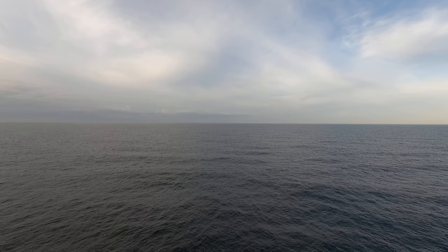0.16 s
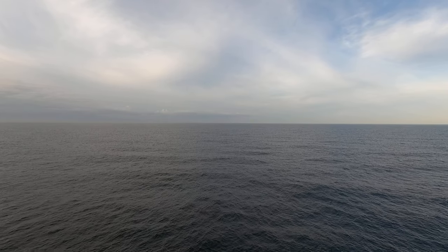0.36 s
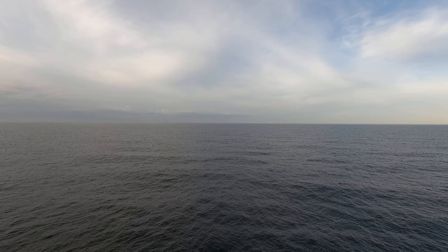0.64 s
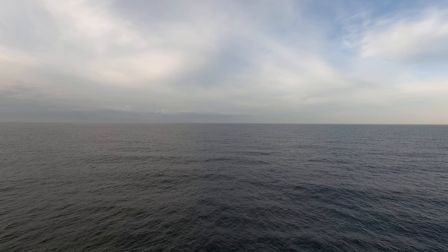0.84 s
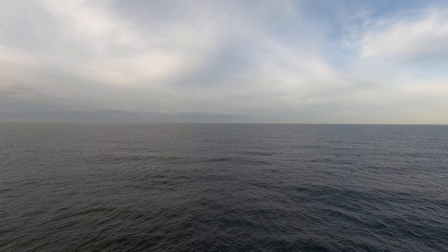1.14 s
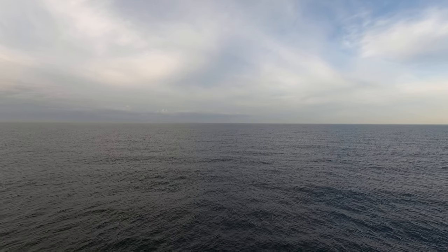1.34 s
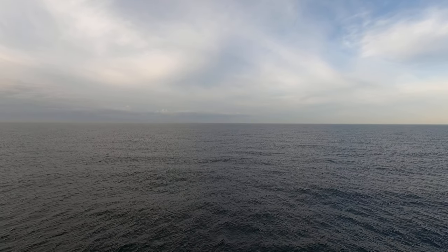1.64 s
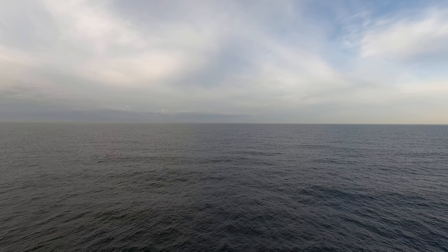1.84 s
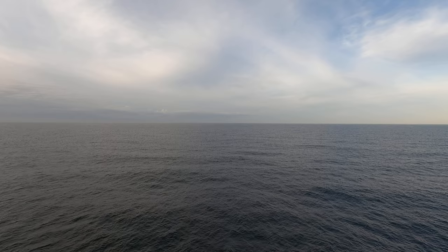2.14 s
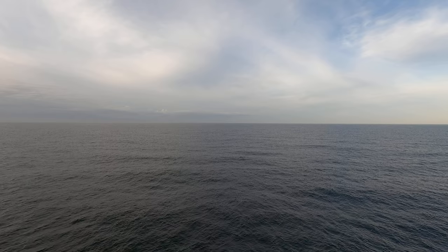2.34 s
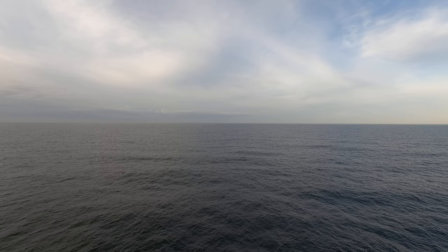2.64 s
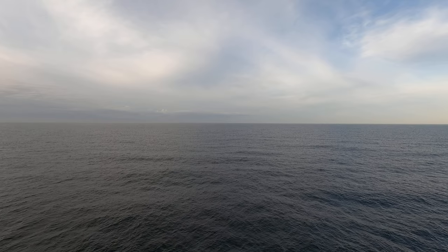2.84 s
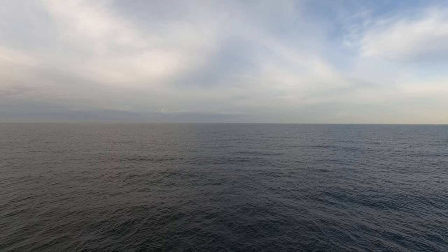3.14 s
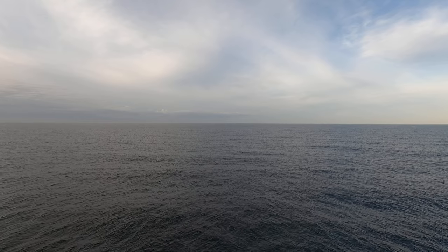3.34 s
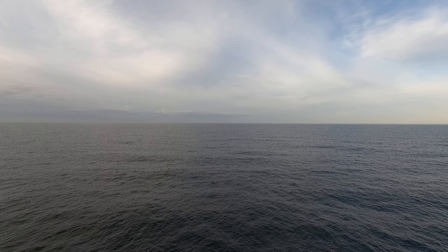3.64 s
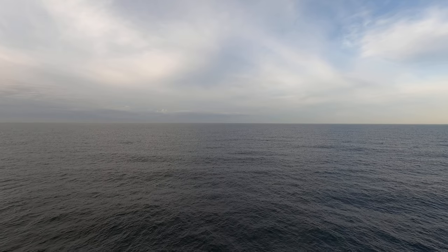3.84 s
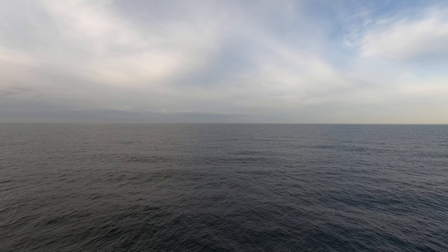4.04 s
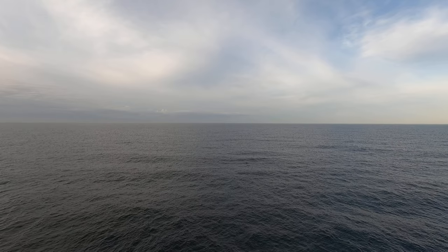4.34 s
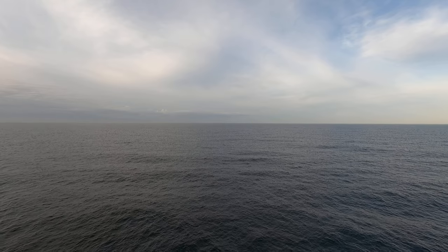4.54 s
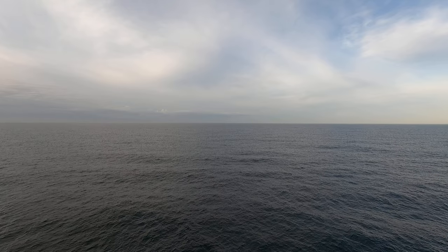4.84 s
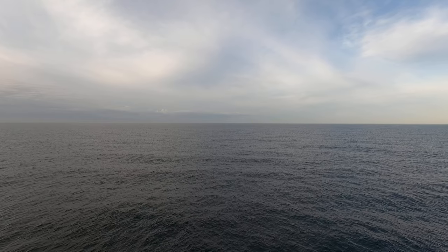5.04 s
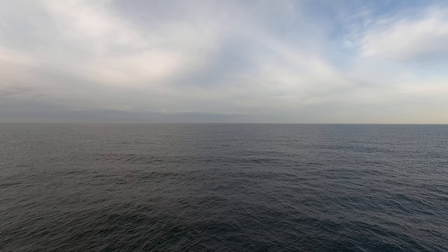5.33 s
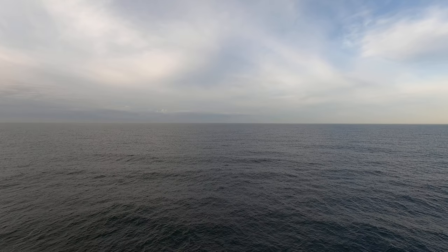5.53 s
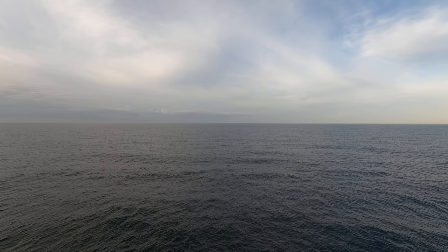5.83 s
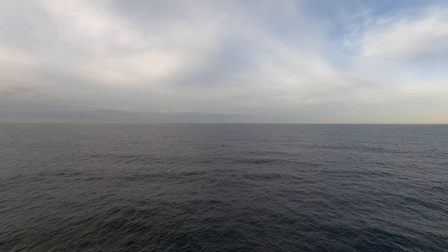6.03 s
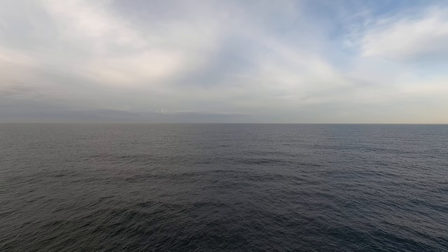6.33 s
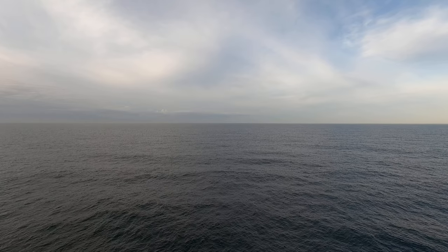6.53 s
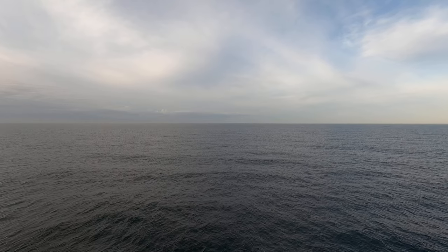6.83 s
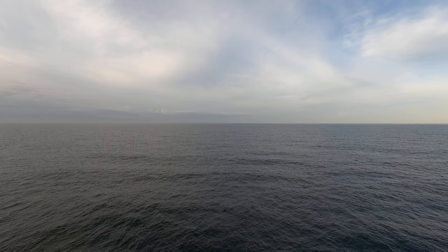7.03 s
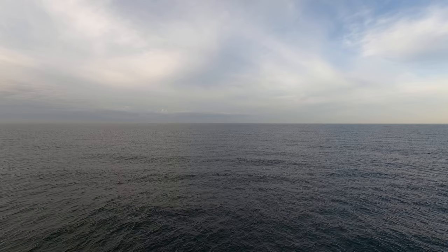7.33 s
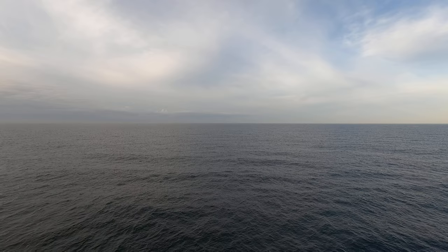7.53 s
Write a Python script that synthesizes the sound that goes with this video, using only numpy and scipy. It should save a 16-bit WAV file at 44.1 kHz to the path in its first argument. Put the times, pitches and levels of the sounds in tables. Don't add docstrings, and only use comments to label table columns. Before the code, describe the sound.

Strong steady wind buffets a bare microphone at sea, deep uneven rumble with fluttering puffs, hard thumps and a faint distant water hiss.

```python
import sys
import numpy as np
from scipy import signal
from scipy.fft import rfft, irfft, next_fast_len
from scipy.io import wavfile
from scipy.ndimage import uniform_filter1d

SR = 44100
rng = np.random.default_rng(int(sys.argv[2]) if len(sys.argv) > 2 else 0)


def to_wav(sig):
    pcm = np.clip(np.atleast_2d(sig), -1, 1) * 32767
    pcm = np.round(pcm).astype(np.int16)
    wavfile.write(sys.argv[1], SR, pcm.T)


def nominal_scale(level):
    x = np.asarray(level, float) / 20
    return 10 ** x


N = 338584

# t/s, flutter level (speed)/dB, buffet level (squareness to port)/dB
WIND_COURSE = [(0.0, -45.5, -24.5), (0.25, -43.5, -23.5), (0.48, -39.5, -26.5), (0.63, -45, -27),
               (0.79, -38.5, -25.5), (0.92, -46, -24.5), (1.4, -44.5, -22), (1.8, -37.5, -27.5),
               (2.4, -42.5, -25), (3.2, -38, -27.5), (3.75, -38, -25.5), (4.15, -43.5, -21),
               (4.4, -40, -23), (5.0, -43, -25.5), (6.0, -36.5, -26), (6.7, -37, -22), (7.3, -39, -28),
               (7.68, -42, -25)]


def rms_one(x):
    return x / np.sqrt(np.mean(x ** 2) + 1e-20)


def in_time(rows):
    t_s, *columns = np.transpose(rows)
    return [np.interp(np.arange(N) / SR, t_s, column) for column in columns]


def drift(rate_hz):
    r = np.exp(-2 * np.pi * rate_hz * 40 / SR)
    noise = rng.standard_normal(N // 40 + 2002)
    slow = signal.lfilter([1], [1, -2 * r, r * r], noise)[2000:]
    return np.interp(np.arange(N) / 40, np.arange(len(slow)), rms_one(slow))


def turbulence(spectrum, shared_db, shared_rate_hz, own_db, own_rate_hz, count):
    size = next_fast_len(N)
    log_f = np.log(np.maximum(np.arange(size // 2 + 1) * SR / size, 1))
    f_hz, level_db = np.transpose(spectrum)
    colour_db = np.interp(log_f, np.log(f_hz), level_db, left=-200, right=-200)
    coloured = rfft(rng.standard_normal(size)) * nominal_scale(colour_db)
    place = np.interp(log_f, np.log(f_hz[[0, -1]]), [0, count - 1])
    together = drift(shared_rate_hz)
    out = 0
    for k in range(count):
        band = irfft(coloured * np.clip(1 - abs(place - k), 0, 1), size)[:N]
        out = out + band * nominal_scale(shared_db * together + own_db * drift(own_rate_hz))
    return rms_one(out)


def steadied(x, window_s, share):
    size = int(window_s * SR)
    power = uniform_filter1d(uniform_filter1d(x ** 2, size), size)
    return rms_one(x / (power + 0.022) ** (share / 2))


def bells(eddies, stretch):
    power, t = np.zeros(N), np.arange(N) / SR
    for t_s, level_db, length_s in eddies:
        near = slice(max(int((t_s - 0.12) * SR), 0), int((t_s + 0.12) * SR))
        sigma_s = stretch * max(length_s, 0.004)
        power[near] += nominal_scale(2 * level_db) * np.exp(-0.5 * ((t[near] - t_s) / sigma_s) ** 2)
    return np.sqrt(power)


def lulls(spells):
    t, gain_db = np.arange(N) / SR, np.zeros(N)
    for t_s, depth_db, spread_s in spells:
        near = slice(max(int((t_s - 0.6) * SR), 0), int((t_s + 0.6) * SR))
        gain_db[near] -= depth_db * np.exp(-0.5 * ((t[near] - t_s) / max(spread_s, 0.008)) ** 2)
    return gain_db


def rumble():
    # f/Hz, level/dB per Hz
    spectrum = [(5, -30.5), (9, -4), (16, 0.5), (27, 0.5), (45, 3), (65, -2), (90, -5.5), (130, -11.5),
                (180, -21.5), (260, -39.5)]
    # t/s, depth (negative = heavier)/dB, spread/s
    gaps = [(0.0, 1, 0.012), (0.13, -2.5, 0.045), (0.3, -1, 0.18), (0.49, 0.5, 0.045), (0.66, -4, 0.031),
            (0.79, 5, 0.032), (0.97, 1, .07), (1.13, 6, 0.033), (1.55, 0, 0.09), (1.7, 6, 0.019),
            (1.92, 6, 0.04), (2.51, 3, 0.023), (3.09, -1.5, 0.036), (2.22, -4.5, 0.044), (2.35, 10, 0.037),
            (2.63, 8.5, 0.043), (2.8, 10, 0.019), (3.2, 2, 0.14), (3.63, 2, 0.073), (3.82, -2, 0.044),
            (4.21, 3, 0.14), (5.0, 0.5, 0.13), (5.55, -1.5, 0.073), (5.8, 3.5, 0.083), (5.3, 1, 0.055),
            (6.05, -2.5, 0.055), (6.165, 6, 0.024), (6.22, 2.5, 0.076), (6.6, -1, 0.18), (6.92, -2, 0.032),
            (7.42, 3, 0.03)]
    eddies = turbulence(spectrum, shared_db=2.5, shared_rate_hz=10, own_db=1.0, own_rate_hz=8.3, count=4)
    level_db = -20 + lulls(gaps) - 0.6 * drift(2.3)
    return nominal_scale(level_db) * steadied(eddies, window_s=0.065, share=0.65)


def buffet():
    # f/Hz, level/dB per Hz
    spectrum = [(59, -16.5), (100, -2), (172, -2.5), (275, -1), (640, -19.5), (900, -26.5), (1170, -28.5),
                (1980, -120)]
    # t/s, depth (negative = swell)/dB, spread/s
    turns = [(0.14, 6, 0.058), (1.487, -0.5, .03), (1.784, 0, 0.02), (2.26, 8, 0.031), (2.53, 3, 0.065),
             (2.85, 1.5, 0.055), (3.05, -1.5, 0.055), (3.787, -4.5, 0.024), (4.349, -3, 0.051),
             (4.907, 0.5, 0.04), (5.133, -3.5, 0.024), (5.3, 2, 0.045), (5.63, 1.5, 0.025), (6.15, -1, .05),
             (6.271, -1.5, 0.039), (6.772, 5, 0.053), (7.1, 3, 0.042)]
    # t/s, level/dB, length/s
    thumps = [(0.197, -24, 0.016), (0.345, -23, 0.02), (0.7, -23, 0.0085), (1.126, -28, 0.025),
              (1.38, -20, 0.022), (1.6, -19.5, 0.026), (1.823, -24, 0.032), (2.195, -14, 0.017),
              (2.728, -35, 0.021), (3.169, -23.5, 0.026), (3.5, -24, 0.051), (3.845, -15.5, 0.016),
              (4.044, -22, 0.015), (4.319, -21, 0.028), (4.45, -17.5, 0.024), (4.599, -20, 0.027),
              (4.717, -16, 0.0085), (4.847, -21.5, 0.048), (4.933, -19, 0.013), (5.272, -22, 0.024),
              (5.431, -22.5, 0.049), (5.582, -22.5, 0.037), (5.868, -23.5, 0.048), (6.053, -21.5, 0.013),
              (6.3, -24, 0.048), (6.47, -27, 0.11), (6.588, -18, 0.016), (6.737, -23, 0.016),
              (7.081, -20, 0.044), (7.424, -27.5, 0.098), (7.635, -25.5, 0.074)]
    eddies = turbulence(spectrum, shared_db=0.0, shared_rate_hz=7, own_db=1.0, own_rate_hz=5.9, count=4)
    flow_db = in_time(WIND_COURSE)[1] + lulls(turns)
    level = np.hypot(nominal_scale(flow_db), nominal_scale(1.0) * bells(thumps, stretch=0.33))
    return level * steadied(eddies, window_s=0.027, share=0.35)


def puff_rows():
    # t/s, level/dB, length/s, bright tip/dB
    strong = [(0.199, -32.5, 0.013, -58), (0.302, -35, 0.027, -42.5), (0.367, -36, 0.017, -44),
              (0.48, -42, 0.047, -42.5), (0.609, -35.5, 0.017, -47), (0.698, -31.5, 0.013, -55),
              (0.784, -44, 0.038, -45.5), (0.955, -39, 0.012, -47), (1.353, -36.5, 0.084, -53),
              (1.638, -31.5, 0.015, -55), (2.272, -36, 0.021, -45), (2.759, -32.5, 0.021, -48),
              (2.888, -43, 0.01, -40), (3.26, -48, 0.051, -48.5), (3.76, -34.5, 0.082, -48),
              (3.97, -34, 0.057, -56), (4.376, -35.5, 0.072, -48), (4.452, -30.5, 0.011, -55),
              (4.719, -50, 0.0091, -36), (4.836, -34.5, 0.015, -48), (5.049, -32.5, 0.019, -59),
              (5.755, -30.5, 0.016, -47.5), (6.236, -34, 0.016, -44), (6.305, -33, 0.025, -38.5),
              (6.59, -48, 0.019, -41), (6.74, -32, 0.023, -41), (6.99, -35.5, 0.033, -47),
              (7.09, -39, 0.012, -36.5), (7.222, -33, 0.02, -38), (7.441, -32.5, 0.027, -48)]
    # t/s, level/dB
    middling = [(0.072, -42), (0.545, -51), (0.74, -38), (0.83, -49), (1.11, -40), (1.288, -38),
                (1.481, -36.5), (1.54, -36.5), (1.77, -42.5), (1.95, -38), (2.13, -41), (2.42, -38),
                (2.48, -37.5), (2.99, -37), (3.09, -36.5), (3.178, -39), (3.429, -35), (3.636, -34),
                (4.41, -33), (4.96, -36.5), (5.12, -35.5), (5.23, -37), (5.33, -34.5), (5.44, -36.5),
                (5.533, -40), (5.82, -37.5), (6.183, -33), (6.43, -33.5), (6.87, -36.5), (7.328, -35)]
    # t/s, level/dB
    least = [(0.41, -40), (0.519, -53), (0.589, -39), (0.715, -43), (0.9, -52), (0.997, -41.5),
             (1.057, -42), (1.171, -44.5), (1.238, -42), (1.425, -48), (1.668, -42), (1.749, -36),
             (1.815, -38), (1.9, -39), (2.032, -38), (2.113, -37), (2.247, -40), (2.317, -38.5),
             (2.365, -36.5), (2.556, -40), (2.638, -38), (2.712, -38), (2.812, -41), (2.855, -37),
             (3.049, -52), (3.278, -35), (3.346, -39), (3.464, -40), (3.53, -33), (3.604, -43),
             (3.713, -37), (3.844, -38), (3.885, -50), (4.003, -37.5), (4.059, -50), (4.108, -47.5),
             (4.167, -38.5), (4.548, -46), (4.599, -43.5), (4.814, -41), (4.876, -48), (4.904, -36.5),
             (5.198, -35.5), (5.25, -37.5), (5.377, -46), (5.587, -44), (5.622, -39), (5.655, -41),
             (5.701, -40), (5.865, -44), (5.9, -45), (5.98, -36), (6.371, -43), (6.505, -39), (6.66, -31.5),
             (6.697, -33), (6.818, -40), (6.851, -32), (6.921, -31.5), (7.146, -38)]
    middling_rows = [(t_s, level_db, 0.033, level_db - 14.5) for t_s, level_db in middling]
    least_rows = [(t_s, level_db, 0.025, level_db - 16) for t_s, level_db in least]
    return np.vstack([strong, middling_rows, least_rows])


def flutter():
    # f/Hz, level/dB per Hz
    spectrum = [(290, -9), (500, -3), (642, -9), (1680, -15.5), (3050, -35.5), (3960, -54.5), (6710, -120)]
    # t/s, depth (negative = swell)/dB
    slacks = [(0.143, 4.5), (0.33, 2), (0.67, 4.5), (0.87, 6), (1.195, 2), (1.465, 5), (1.86, 0.5),
              (1.927, 2.5), (2.35, 4), (2.445, 2.5), (2.786, 3), (2.929, -0.5), (3.065, 1), (3.307, 0),
              (3.499, 1), (3.82, 1), (3.933, 3.5), (4.025, 4), (4.229, 1.5), (4.49, 3), (4.665, 4.5),
              (5.469, 3), (5.555, 0.5), (5.784, 5), (6.081, 3), (6.162, 8), (6.325, 2.5), (6.555, 1.5),
              (6.777, 3), (6.955, -2), (7.06, 1.5), (7.26, -0.5), (7.477, 0.5), (7.545, 3.5), (7.62, -3),
              (7.66, -6)]
    eddies = turbulence(spectrum, shared_db=3.5, shared_rate_hz=260, own_db=0.17, own_rate_hz=46, count=5)
    slack_spread_s = 0.014
    slack_db = lulls([(t_s, depth_db, slack_spread_s) for t_s, depth_db in slacks])
    flow_db = in_time(WIND_COURSE)[0] + slack_db
    puffs = bells(puff_rows()[:, :3], stretch=0.25)
    level = np.hypot(nominal_scale(flow_db + 6.0), nominal_scale(4.5) * puffs)
    return level * steadied(eddies, window_s=0.017, share=1.0)


def sea():
    # t/s, level/dB
    swell = [(0.0, -57), (0.67, -57), (1.59, -55), (1.99, -55.5), (2.35, -57.5), (3.3, -54.5),
             (3.64, -53.5), (3.94, -55.5), (4.42, -53.5), (4.95, -56.5), (5.44, -56), (5.97, -53),
             (6.29, -53), (7.3, -55.5), (7.6, -56)]
    # f/Hz, level/dB per Hz
    spectrum = [(1500, -9), (2300, -6.5), (3200, -0.5), (5000, -4.5), (6000, -9.5), (8300, -20.5),
                (10500, -33), (11500, -42), (12500, -51.5), (13400, -64)]
    wash = turbulence(spectrum, shared_db=-0.36, shared_rate_hz=27, own_db=-0.24, own_rate_hz=19, count=5)
    return nominal_scale(in_time(swell)[0] + 3.0) * wash


def spit():
    # f/Hz, level/dB per Hz
    spectrum = [(1300, -23.5), (2000, 2.5), (2700, -7.5), (3500, -17), (4800, -32.5)]
    # t/s, peak/dB
    snaps = [(0.0343, -44), (0.2977, -36), (0.3681, -36), (0.5776, -39), (0.608, -38), (0.7372, -34),
             (0.7801, -35), (0.9537, -42), (1.4795, -38), (2.2697, -38), (2.7571, -37), (2.8883, -36),
             (2.9452, -33), (3.0126, -34), (3.0844, -41), (3.244, -34), (3.4281, -38), (3.7693, -32),
             (3.9664, -36), (4.363, -25), (4.7212, -35), (4.8349, -35), (5.0374, -42), (5.219, -35),
             (5.4196, -38), (5.7558, -35), (5.8551, -29), (6.0541, -28), (6.115, -38), (6.1823, -37),
             (6.2891, -31), (6.4198, -37), (6.4657, -34), (6.5021, -33), (6.5834, -39), (6.7301, -33),
             (6.8214, -35), (6.8623, -31), (6.9222, -38), (6.9726, -35), (7.0853, -35), (7.2175, -32),
             (7.3253, -34), (7.3607, -41)]
    hiss = turbulence(spectrum, shared_db=7.0, shared_rate_hz=260, own_db=-0.5, own_rate_hz=30, count=2)
    lag_s, gain_db, length_s = 0.004, -12, 0.0097
    snap_rows = [(t_s + lag_s, peak_db + gain_db, length_s) for t_s, peak_db in snaps]
    tips = np.vstack([puff_rows()[:, [0, 3, 2]], snap_rows])
    return nominal_scale(-0.6) * bells(tips, stretch=0.31) * steadied(hiss, window_s=0.006, share=0.67)


def whirls():
    # t/s, f/Hz, level/dB, length/s
    whirl_rows = [(0.33, 116, -23.5, .06), (1.3, 190, -30, .08), (1.58, 270, -22, .09),
                  (1.84, 90, -22, .05), (2.2, 149, -26, 0.057), (2.2, 293, -23, 0.044),
                  (2.45, 55, -23, .08), (3.85, 240, -27, .05), (3.86, 60, -24, .08),
                  (4.35, 145, -24, 0.066), (4.7, 65, -23, 0.055), (4.85, 115, -24, .07),
                  (4.95, 350, -30, .08), (5.08, 436, -31, 0.097), (6.1, 430, -31, .06),
                  (6.3, 200, -27, .06), (6.97, 350, -28, .08), (7.1, 115, -18.5, 0.064),
                  (7.15, 370, -30, .06), (7.42, 298, -21, 0.058), (7.47, 174, -26, 0.076),
                  (0.13, 315, -28, .09), (0.21, 350, -26.5, .06), (0.5, 309, -27, .09),
                  (1.36, 442, -29, 0.076), (1.55, 348, -28, 0.065), (1.92, 170, -27.5, .07),
                  (2.275, 60, -22.5, .06), (3.2, 150, -28, .1), (4.17, 445, -32, .06),
                  (4.45, 282, -26, .05), (5.17, 270, -27, .05), (5.2, 185, -28, .06), (6.9, 70.5, -26, .07),
                  (7.0, 150, -26, .06), (0.652, 620, -33, .02), (1.032, 796, -37, .02),
                  (2.196, 560, -30, .015), (4.6, 600, -28, .015), (4.718, 650, -32, .015),
                  (5.094, 650, -34, .02), (5.504, 594, -31, .02), (7.204, 700, -30, .015),
                  (0.304, 750, -32, .015)]
    out = np.zeros(N)
    for t_s, f_hz, level_db, length_s in whirl_rows:
        near = slice(int((t_s - 0.12) * SR), int((t_s + 0.12) * SR))
        t = np.arange(N)[near] / SR - t_s
        bell = np.exp(-0.5 * (t / (0.35 * length_s)) ** 2)
        phase = 2 * np.pi * f_hz * t * (1 - 0.8 * t) + rng.uniform(0, 2 * np.pi)
        out[near] += nominal_scale(level_db) * bell * np.sin(phase)
    return out


def high_ticks():
    # t/s, peak/dB
    ticks = [(0.17, -81), (0.7113, -82), (0.9408, -77), (1.2955, -70), (1.8233, -73), (2.2448, -73),
             (2.3351, -82), (2.802, -78), (3.1058, -79), (5.0315, -82), (6.8494, -86), (7.0314, -82),
             (7.3138, -82), (7.4819, -77)]
    lag_s, gain_db, length_s = 0.006, -8, 0.012
    rows = [(t_s + lag_s, peak_db + gain_db, length_s) for t_s, peak_db in ticks]
    band = signal.butter(6, [12000, 15600], "band", fs=SR, output="sos")
    return signal.sosfilt(band, bells(rows, stretch=0.3) * rng.standard_normal(N) + 1e-18)


def rolls():
    # t/s, level/dB, length/s
    lumps = [(0.195, -21, 0.029), (0.334, -16.5, 0.043), (1.204, -35, 0.051), (0.732, -22, 0.029),
             (0.84, -24, 0.023), (0.952, -31, 0.029), (1.309, -18.5, 0.09), (1.837, -19, 0.018),
             (1.979, -19.5, 0.063), (2.18, -24, 0.03), (2.249, -20.5, 0.018), (2.27, -22.5, 0.018),
             (2.459, -27, 0.051), (2.618, -22.5, 0.066), (2.737, -19, 0.034), (2.869, -26, 0.11),
             (2.968, -33, 0.094), (3.15, -24, 0.061), (3.233, -21, 0.057), (3.314, -21, 0.034),
             (3.643, -25.5, 0.097), (3.761, -34, 0.03), (4.156, -19, 0.041), (4.314, -43, 0.046),
             (4.71, -34, 0.026), (4.84, -15.5, 0.044), (5.055, -22.5, 0.025), (5.499, -26, 0.099),
             (5.768, -22, 0.039), (6.047, -18, 0.031), (6.25, -23.5, 0.05), (6.59, -23, 0.059),
             (6.929, -31, 0.046), (7.04, -24, 0.037), (7.097, -20.5, 0.032), (7.18, -23.5, 0.056),
             (7.492, -33, 0.045), (7.626, -26, 0.039)]
    # f/Hz, level/dB per Hz
    spectrum = [(35, -33), (65, -0.5), (110, -1.5), (170, -6.5), (260, -28)]
    air = turbulence(spectrum, shared_db=-4.5, shared_rate_hz=2.7, own_db=0.5, own_rate_hz=4.6, count=2)
    return nominal_scale(-2.1) * bells(lumps, stretch=0.4) * steadied(air, window_s=0.0037, share=1.0)


def scene():
    wind = rumble() + buffet() + flutter() + spit() + rolls()
    return (wind + sea() + whirls())[None]


def limiter(x):
    ceiling_db, squeeze, attack_s, recovery_db_per_s = -11, 0.35, 0.0016, 67.5
    over_db = np.maximum(20 * np.log10(abs(x[0]) + 1e-9) - ceiling_db, 0)
    climb_db = recovery_db_per_s * np.arange(N) / SR
    held_db = np.maximum.accumulate(over_db + climb_db) - climb_db
    r = np.exp(-1 / (attack_s * SR))
    look_ahead = int(2 * attack_s * SR)
    duck_db = np.roll(signal.lfilter([1 - r], [1, -r], held_db), -look_ahead)
    return x * nominal_scale(-squeeze * duck_db)


def low_pass(x):
    return signal.sosfilt(signal.butter(12, 15800, fs=SR, output="sos"), x)


def record(dry):
    ducked = limiter(dry)
    top = 0.47
    rounded = ducked / (1 + (ducked / top) ** 6) ** (1 / 6)
    top_cut = signal.cheby2(14, 70, 13500, fs=SR, output="sos")
    mix = signal.sosfilt(top_cut, rounded) + high_ticks()
    return low_pass(mix)


dry = scene()
out = record(dry)
to_wav(out)
```